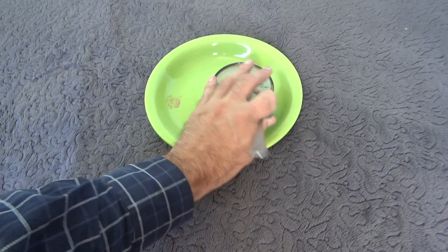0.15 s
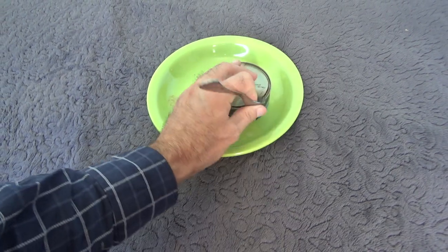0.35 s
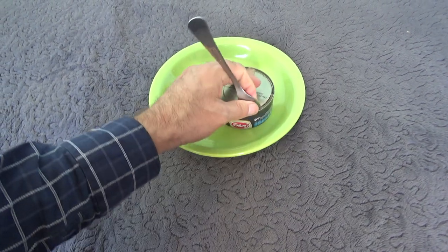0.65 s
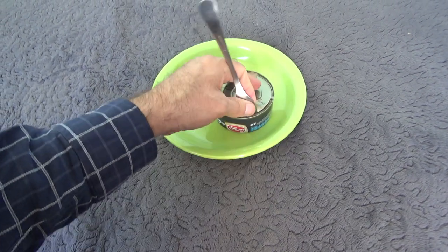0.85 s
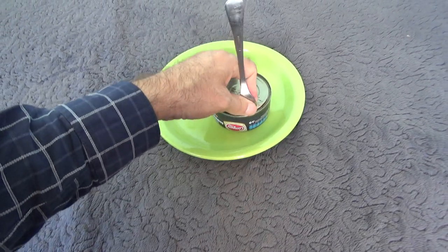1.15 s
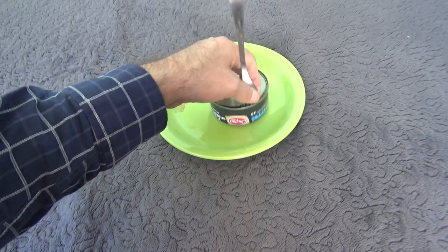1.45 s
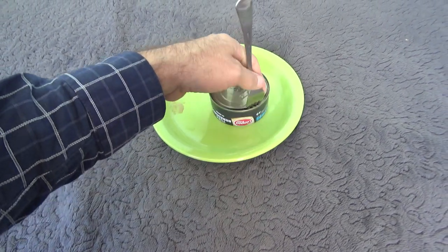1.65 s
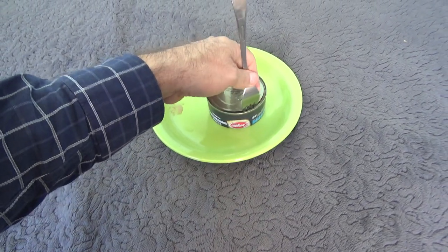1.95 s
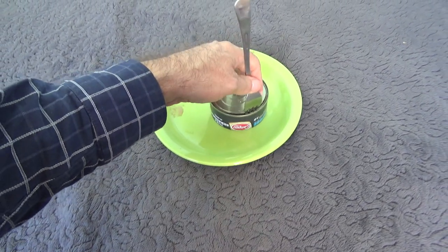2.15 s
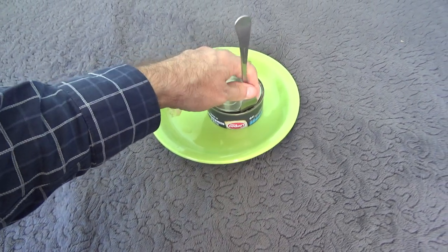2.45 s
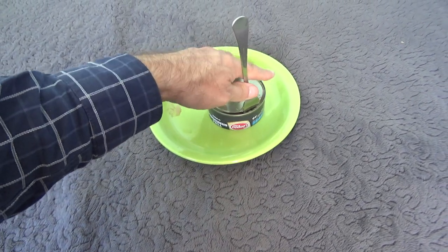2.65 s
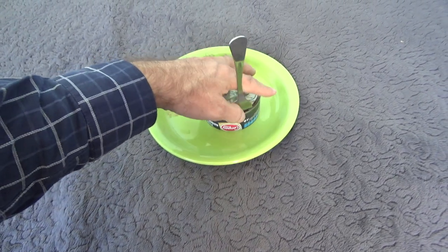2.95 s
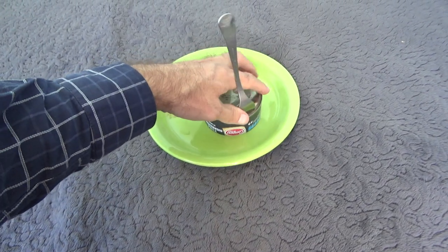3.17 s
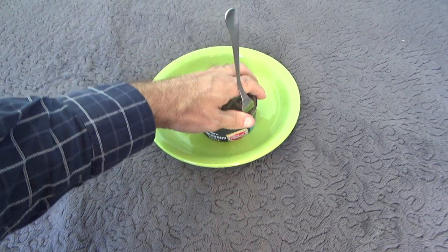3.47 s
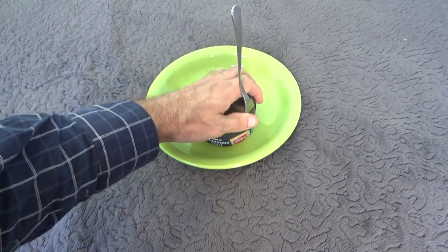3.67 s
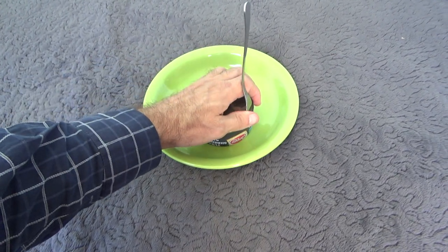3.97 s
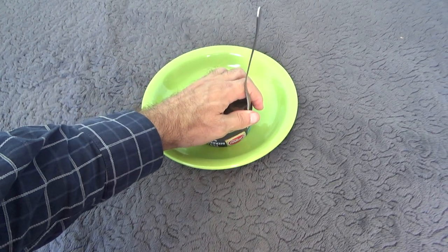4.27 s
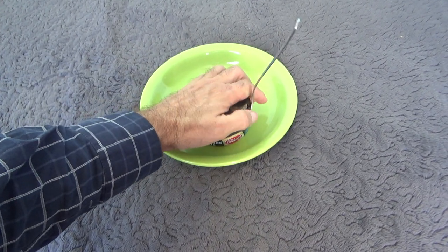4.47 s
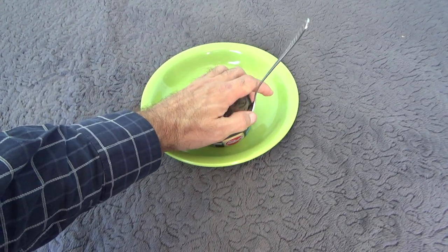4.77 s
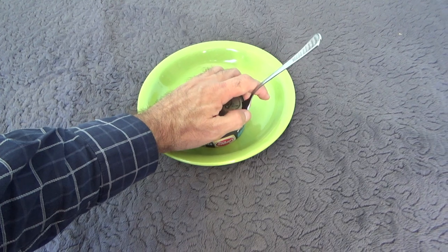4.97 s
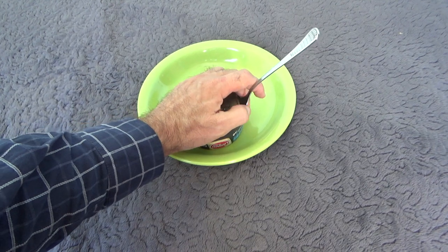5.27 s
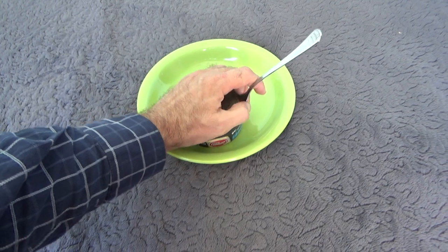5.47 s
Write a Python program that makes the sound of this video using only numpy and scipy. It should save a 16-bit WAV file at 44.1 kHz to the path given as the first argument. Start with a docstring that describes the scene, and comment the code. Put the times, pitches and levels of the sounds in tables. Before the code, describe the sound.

Steel fork clinks and scratches on a small tin, forcing its lid in three short loud rasps, in a small softly humming room.

```python
"""Prying open a tin can

A fork pries at the lid of a tin can that stands on a plate, in a small room with a humming appliance.
Steel knocks and chirps on the tin, forces the lid in three loud rasps, and scratches lightly along the rim.
Scrapes are streams of tiny slips that ring the can under a coloured noise; short bursts wake damped sines.
The plate bumps and rumbles on its cloth; filtered noise makes the hum, the air and the room's tail.
"""
import sys
import numpy as np
from scipy import signal
from scipy.fft import rfft, irfft
from scipy.io import wavfile
from scipy.ndimage import uniform_filter1d

SR = 44100
rng = np.random.default_rng(int(sys.argv[2]) if len(sys.argv) > 2 else 0)


def transcribe(u):
    """Save the signal u as a 16-bit wav file named by the first command-line argument.

    u: samples, shape (n,) or (channels, n), limited to [-1, 1]; the rate is SR.
    q: integer samples, one column per channel.
    """
    v = np.clip(np.atleast_2d(u).T, -1, 1)
    q = np.round(v * 32767).astype(np.int16)
    wavfile.write(sys.argv[1], SR, q)


N = 247930
BINS = np.fft.rfftfreq(8192, 1 / SR)  # frequency grid of the filters, Hz

# The can's resonances, for short bursts and light scratches.
# Each row: centre in Hz, width in Hz, relative level in dB.
CAN_MODES = [(1063, 77, -3.5), (1388, 340, -15.5), (1390, 14, 6), (1530, 12, -1.5), (1850, 160, -6.5),
             (2007, 95, -4), (2430, 83, -17.5), (3290, 144, -8.5)]


def gain_of(db):
    """Decibels to amplitude."""
    return 10 ** (np.asarray(db) / 20)


def evened(x):
    """Scales to rms 1."""
    return x / np.sqrt(np.mean(x ** 2) + 1e-20)


def read(points, hz):
    """Reads a spectrum table between its points on a log-frequency axis."""
    f, value = np.transpose(points)
    return np.interp(np.log(hz + 1), np.log(f + 1), value)


def add(mix, s, sound):
    """Mixes a sound in at time s, in seconds."""
    part = mix[max(round(s * SR), 0):][:len(sound)]
    part += sound[:len(part)]


def resonances(modes, hz=BINS):
    """Amplitude response of damped modes, summed in power."""
    f = hz + 1
    power = 0
    for centre, width, db in modes:
        detuning = (f * f - centre ** 2) / (f * width)
        power = power + gain_of(db) ** 2 / (1 + detuning ** 2)
    return np.sqrt(power)


def ring(drive, gain):
    """Passes a force through a causal minimum-phase filter of this spectral shape and unit energy."""
    log_gain = np.log(np.concatenate([gain, gain[-2:0:-1]]) + 1e-6)
    response = np.exp(np.conj(signal.hilbert(log_gain)))
    taps = np.fft.ifft(response).real[:len(gain)]
    return signal.fftconvolve(drive, taps / np.linalg.norm(taps))


def struck(modes, bass_hz, order=3):
    """Damped sines of alternating sign: the ring takes a few cycles to build, and gives off little bass."""
    t = np.arange(SR // 5) / SR
    out = np.zeros(len(t))
    for k, (hz, width, db) in enumerate(sorted(modes)):
        decay = np.exp(-np.pi * width * t)
        out += (-1) ** k * gain_of(db) * width * decay * np.sin(2 * np.pi * hz * t)
    bass_cut = signal.butter(order, bass_hz, "high", fs=SR, output="sos")
    return signal.sosfilt(bass_cut, out)


def slips(size, per_s, spread_db, rub):
    """Stick and slip: random clicks of uneven size over a fine rubbing, at steady mean power."""
    chance = rng.random(size)
    strength = rng.exponential(1, size)
    fine = rng.standard_normal(size)
    clicks = (chance < per_s / SR) * gain_of(spread_db * np.minimum(strength, 4)) * np.sign(fine)
    force = evened(clicks) + rub * fine
    return force / np.sqrt(abs(uniform_filter1d(force ** 2, size=400)) + 1e-9)


def diffuse(pair):
    """Spectra of two unrelated signals, made as alike as the two microphones hear the room."""
    # Each row: frequency in Hz, likeness of the two sides from 0 to 1.
    likeness = [(60, 0.83), (300, 0.41), (1500, 0.95), (4000, 0.52), (14000, 0.73)]
    a, b = rfft(pair)
    same = np.clip(read(likeness, np.fft.rfftfreq(pair.shape[1], 1 / SR)), 0, 1)
    shared = np.sqrt((1 + same) / 2) * a
    own = np.sqrt((1 - same) / 2) * b
    return shared + np.array([own, -own])


def background(hum_db=-48, air_db=-53):
    """An appliance hums in narrow, wavering bands of noise over the faint air of the room."""
    # Bands of the hum. Each row: centre in Hz, width in Hz, relative level in dB.
    hum_bands = [(146.2, 2.8, 6.5), (138.5, 7.1, -15), (206.4, 5.8, -2.5), (257.8, 13.5, -4),
                 (299.2, 8.8, -0.5), (324, 32, -8), (589.6, 9.5, -11.5), (716.3, 14.4, -4.5),
                 (766, 15, -13), (849, 18.5, -7)]
    # Spectrum of the air. Each row: frequency in Hz, relative level in dB per Hz.
    air_spectrum = [(20, -6), (50, -4), (100, 3), (130, -2.5), (180, -10.5), (400, -2), (600, -8),
                    (1000, -13.5), (1400, -12), (1900, -10.5), (2350, -16.5), (4500, -18), (6300, -13),
                    (8500, -17), (12500, -18), (16000, -23.5)]
    hz = np.fft.rfftfreq(N, 1 / SR)
    hum = irfft(diffuse(rng.standard_normal((2, N))) * resonances(hum_bands, hz), N)
    air = irfft(diffuse(rng.standard_normal((2, N))) * gain_of(read(air_spectrum, hz)), N)
    return gain_of(hum_db) * evened(hum) + gain_of(air_db) * evened(air)


def room(x, first_s=0.0025, build_s=0.011):
    """The room's short tail: diffuse noise that builds up, then decays at its own pace in each band."""
    # Decay. Each row: frequency in Hz, time to fall by 60 dB in seconds.
    decay_times = [(300, 0.17), (1500, 0.39), (3200, 0.3958), (6000, 0.3), (14000, 0.18)]
    # Strength. Each row: frequency in Hz, level in dB against the direct sound.
    tail_levels = [(200, -8.5), (1600, -6), (3200, -5), (6000, -9.5), (14000, -15)]
    t = np.arange(SR // 2) / SR
    swell = np.clip((t - first_s) / build_s, 0, 1)
    noise = irfft(diffuse(rng.standard_normal((2, len(t))))) * swell
    hz, at, z = signal.stft(noise, SR, nperseg=256)
    t60 = read(decay_times, hz)[:, None]
    unit_energy = np.sqrt(2 * np.log(1000) / (t60 * SR))
    fade = np.exp(-np.log(1000) * at / t60) * unit_energy
    level = gain_of(read(tail_levels, hz))[:, None]
    tail = signal.istft(z * fade * level, SR, nperseg=256)[1][:, :len(t)]
    return signal.fftconvolve(x[None], tail, axes=1)[:, :N]


def nearby(x, near_s=0.0013, count=5):
    """Quick reflections off plate and hand widen the sound; they change as the hand moves."""
    # What reaches the two microphones unequally.
    # Each row: frequency in Hz, level in dB against the direct sound.
    side_levels = [(100, -2), (500, -2.5), (1500, -8.5), (3000, -20), (5000, -11), (9000, -6), (14000, -13)]
    t = np.arange(SR // 40) / SR
    taps = rng.standard_normal((count, len(t))) * np.exp(-t / near_s)
    taps /= np.linalg.norm(taps, axis=1, keepdims=True)
    # steady crossfade from one pattern of reflections to the next
    pose = np.arange(N) / N * (count - 1)
    share = np.sqrt(np.maximum(1 - abs(pose - np.arange(count)[:, None]), 0))
    side = signal.fftconvolve(x * share, taps, axes=1)[:, :N].sum(0)
    side = irfft(rfft(side) * gain_of(read(side_levels, np.fft.rfftfreq(N, 1 / SR))), N)
    return np.array([side, -side])


def plate_shifts(mix):
    """The hand rocks the plate on its soft cloth: swells of noise through low, damped resonances."""
    # Each row: middle in seconds, length in seconds, level in dB.
    shifts = [(0.876, 0.13, -56), (3.784, 0.056, -59), (4.161, .1, -55)]
    # Bounce on the cloth. Each row: centre in Hz, width in Hz, relative level in dB.
    cloth_modes = [(65, 35, 1), (105, 40, -2)]
    for s, length, db in shifts:
        swell = np.hanning(round(2 * length * SR))
        push = swell * rng.standard_normal(len(swell))
        add(mix, s - length, gain_of(db) * ring(push, resonances(cloth_modes) ** 2))


def contact_burst(s, ring_db, spot_hz, tick_db, modes, bass_hz, spot_width_hz=100, spot_db=1, octave_db=9.5,
                  chatter_s=0.0021, chatter=1.0, lead_s=.006, rattle=0.27, rattle_s=0.014):
    """Metal chatters for a few milliseconds around one firm impulse, then rattles to rest."""
    # The bright tick of the chatter. Each row: frequency in Hz, relative level in dB per Hz.
    tick_spectrum = [(100, -51), (900, -38), (2000, 5), (3500, 0), (4400, -0.5), (5400, 5.5), (6500, 1),
                     (8000, 1), (10000, -1.5), (11500, 4), (14000, -6), (16000, -12)]
    t = np.arange(0, 6 * lead_s, 1 / SR) - lead_s
    contacts = slips(len(t), per_s=5800, spread_db=5, rub=0.38)
    burst = contacts * np.exp(-.5 * (t / chatter_s) ** 2)
    burst /= np.linalg.norm(burst)
    settle = contacts * np.exp(-abs(t) / rattle_s) * (t > 0)
    force = chatter * burst + rattle * settle / np.linalg.norm(settle)
    force[np.argmin(abs(t))] += 1  # the firm impulse
    # the force favours the modes near the pitch of the spot it acts on
    woken = [(hz, width, db - octave_db * abs(np.log2(hz / spot_hz))) for hz, width, db in modes]
    spot = (spot_hz, spot_width_hz, spot_db)
    body = signal.fftconvolve(force, struck(woken + [spot], bass_hz))
    sound = gain_of(ring_db) * body / np.linalg.norm(body)
    tick = ring(burst, gain_of(read(tick_spectrum, BINS)))
    add(sound, 0, gain_of(tick_db) * tick)
    return s - lead_s, sound


def plate_bumps(mix):
    """Can and fork bump the plate as the hand takes them up, and wake the plate's modes."""
    # Each row: time in seconds, ring in dB, pitch of the struck spot in Hz, tick in dB.
    bumps = [(0.16, -7.5, 1192, -31), (0.271, -16, 1460, -44), (0.321, -7, 1285, -17),
             (0.3338, -16, 2270, -43), (0.3705, -8.5, 1054, -40)]
    # Each row: centre in Hz, width in Hz, relative level in dB.
    plate_modes = [(278, 87, -3), (630, 150, -14), (862, 63, -1.5), (1046, 30, 0.5), (1196, 46, 0),
                   (1458, 99, -20), (1965, 90, -1.5), (2420, 91, -8.5), (3000, 220, -11)]
    for row in bumps:
        add(mix, *contact_burst(*row, plate_modes, bass_hz=330))


def scratch(s, length, db, spot_width_hz=130, spot_db=3, top_hz=14200, grip=0.04):
    """A light stroke swells and fades: its slips ring the can at the touched spot and hiss in the tines."""
    # Where the fork touches as it works round the can. Each row: time in seconds,
    # pitch of the touched spot in Hz, hiss of the tines in dB over the can's ring.
    contact_path = [(0.33, 1110, -13), (0.6, 1030, -5), (1.05, 990, -3), (1.5, 1530, -3),
                    (3.06, 1620, -6.5), (3.32, 1440, -7.5), (3.74, 1280, -2), (3.98, 1120, -2),
                    (4.13, 1270, 2.5), (5.07, 1650, 1.5), (5.35, 1590, 7)]
    # The tines. Each row: centre in Hz before retuning, width in Hz, relative level in dB.
    tine_modes = [(2170, 225, 0), (2930, 68, -0.5), (3590, 230, -0.5), (4955, 110, 4.5), (5980, 280, -1),
                  (6640, 170, -6.5), (7420, 250, 2.5), (8000, 340, 0), (9700, 1500, -7), (11300, 1300, -3),
                  (12900, 1000, -5)]
    times, pitches, hisses = np.transpose(contact_path)
    spot_hz, hiss_db = np.interp(s, times, pitches), np.interp(s, times, hisses)
    swell = np.hanning(round(2 * length * SR))
    # the grip retunes the tines a little at every stroke
    retune = 1 + grip * rng.standard_normal(len(tine_modes))
    gripped = [(hz * k, width, level) for (hz, width, level), k in zip(tine_modes, retune)]
    force = gain_of(db) * swell * slips(len(swell), per_s=1500, spread_db=0.0, rub=1.0)
    body = ring(force, resonances(CAN_MODES + [(spot_hz, spot_width_hz, spot_db)]))
    tines = ring(force, resonances(gripped) / np.sqrt(1 + (BINS / top_hz) ** 10))
    return s - length, body + gain_of(hiss_db) * tines


def fumble(start, end, db, gap_s=.06, length_s=0.046, spread_db=7):
    """Faint scratches at loose intervals and of uneven strength, as rows for scratch()."""
    times = np.arange(start, end, gap_s)
    late, longer, louder = rng.uniform(-1, 1, (len(times), 3)).T
    return zip(times + late * gap_s / 2, length_s * (1 + longer / 2), db + spread_db * louder)


def rim_scratches(mix):
    """The fork scratches lightly along the rim, and in some spells feels its way more faintly."""
    # Each row: middle in seconds, length in seconds, level in dB.
    strokes = [(0.332, 0.022, -39), (0.671, 0.085, -46), (1.002, .018, -45), (1.044, .066, -50.5),
               (1.91, 0.053, -51), (2.253, 0.064, -49.5), (3.062, .068, -56.5), (3.322, 0.064, -49.5),
               (3.739, 0.03, -42.5), (3.754, .014, -38), (3.857, 0.041, -50.5), (3.919, .029, -53),
               (3.976, 0.025, -48), (4.09, 0.025, -44.5), (4.11, .011, -40), (4.139, 0.021, -43.5),
               (4.159, 0.016, -46.5), (4.201, 0.033, -47), (5.061, .017, -46), (5.093, 0.052, -45.5),
               (5.137, 0.045, -42.5), (5.256, 0.045, -56.5), (5.55, 0.065, -59.5)]
    # Each row: start in seconds, end in seconds, middle level in dB.
    fumbles = [(0.424, 0.92, -55), (1.38, 1.55, -56), (3.482, 3.72, -57), (3.993, 4.06, -55),
               (5.332, 5.45, -60)]
    faint = [row for spell in fumbles for row in fumble(*spell)]
    for row in [*strokes, *faint]:
        add(mix, *scratch(*row))


def can_bursts(mix):
    """Knocks of fork on tin, surges within the first rasp and two short high chirps, all ringing the can."""
    # Each row: time in seconds, ring in dB, pitch of the excited spot in Hz, tick in dB.
    bursts = [(0.9835, -19.5, 850, -20), (1.2409, 6.5, 1660, 0.5), (1.6392, 3.5, 1860, 7),
              (1.6440, -1, 1380, -3), (1.6495, 6, 1940, -4), (1.6670, 7, 1950, -4),
              (2.292, -14, 3700, -12.5), (2.301, -8, 3800, -3), (2.3115, 3.5, 1320, -7),
              (2.3420, 3.5, 1400, -22), (2.6060, -9.5, 1373, -29), (4.8720, -3.5, 1600, -4)]
    for row in bursts:
        add(mix, *contact_burst(*row, CAN_MODES, bass_hz=900))


def rasp(row, modes, grit_colour, per_s, surge_db, bass_hz, surge_s=.003, grit_follow=2,
         start_db=-35.5, let_go_s=0.0046, slide_s=0.065, lift_s=0.036):
    """The fork bites, holds, slips free, slides on and lifts off; surging slips ring the lid amid noise."""
    bite, hold, ring_db, grit_db, rise, sag, drop, fade = row
    # the rasp begins start_db against its bite, which falls at t = 0
    t = np.arange(start_db / rise, hold + slide_s + lift_s, 1 / SR)
    free = np.maximum(t - hold, 0)
    press_db = rise * np.minimum(t, 0) - sag * np.clip(t, 0, hold)
    release_db = -drop * np.minimum(free / let_go_s, 1) - fade * free
    lift = np.minimum((t[-1] - t) / lift_s, 1)

    knots = np.arange(t[0], t[-1] + surge_s, surge_s)
    surges = gain_of(surge_db * np.interp(t, knots, rng.uniform(-1.4, 1, len(knots))))
    scrape = evened(surges * slips(len(t), per_s, spread_db=3, rub=0.94))
    force = scrape * gain_of(release_db) * lift

    radiated = BINS ** 2 / (BINS ** 2 + bass_hz ** 2)  # a small can gives off little bass
    body = ring(force * gain_of(ring_db + press_db), resonances(modes) * radiated)
    # the noise follows the pressure more steeply
    grit_force = force * gain_of(grit_db + grit_follow * press_db)
    grit = ring(grit_force, gain_of(read(grit_colour, BINS)))
    return bite + t[0], body + grit


def lid_rasps(mix):
    """The fork pries, bends and drags along the lid, which rings differently as it loosens."""
    # Each row: bite in seconds, hold in seconds, ring in dB, grit in dB, rise in dB per second,
    # sag during the hold in dB per second, drop on letting go in dB, fade in dB per second.
    rasp_rows = [(1.638, 0.046, -17, -26.5, 1399.5, 20, 3, 265),
                 (2.308, 0.039, -19, -21, 2800, 125, 11.5, 69),
                 (4.814, 0.056, -29, -27.5, 1000, -6, 4, 252)]
    # The lid in each rasp. Each row: centre in Hz, width in Hz, relative level in dB.
    pry_modes = [(119, 110, -13.5), (580, 200, -12.5), (910, 110, -12), (1293, 35, -5), (1390, 36, 2.5),
                 (1430, 81, -4.5), (1580, 40, -1), (1760, 1300, -9.5), (1844, 17, 1), (1940, 25, 2),
                 (1960, 25, -1), (2180, 35, -2.5), (2290, 22, -5), (2600, 39, -3), (2900, 300, -9),
                 (3150, 70, 0.5), (3230, 25, 2), (3620, 700, -8), (3900, 50, -11), (4640, 50, -7.5)]
    bend_modes = [(225, 120, -18), (481, 124, -10.5), (807, 65, -10.5), (960, 90, -12.5), (1140, 66, -14),
                  (1366, 23, 4), (1586, 50, -6), (1900, 150, -24), (2226, 38, -14), (3000, 190, -18.5),
                  (7770, 140, -16)]
    drag_modes = [(560, 70, -14), (964, 130, -10.5), (1360, 70, -22), (1658, 52, 3.5), (1970, 71, -7),
                  (2190, 120, -5.5), (2400, 95, -6.5), (3200, 180, -29), (3730, 280, -13.5),
                  (5180, 68, -4.5), (8270, 96, -9)]
    # Smoothed colour of the noise in each rasp. Each row: frequency in Hz, relative level in dB per Hz.
    pry_colour = [(100, -49), (1000, -20), (2500, 0), (4000, 10), (5500, 7), (7500, 10), (10000, -2),
                  (12500, 1), (14000, -16), (16000, -3)]
    bend_colour = [(100, -45), (1000, -6), (3000, -4), (4800, -3.5), (6200, -9.5), (7600, 0.5),
                   (9500, -0.5), (11500, -0.5), (12800, 3), (14000, -11), (16000, -10)]
    drag_colour = [(100, -40), (1000, -23), (3000, -3.5), (4400, -7), (6000, 1), (7600, 0), (9000, 0.5),
                   (11000, 1), (12600, -3), (13300, 10), (14000, -13), (16000, -26.5)]
    pry, bend, drag = rasp_rows
    add(mix, *rasp(pry, pry_modes, pry_colour, per_s=2500, surge_db=4.5, bass_hz=40))
    add(mix, *rasp(bend, bend_modes, bend_colour, per_s=3400, surge_db=-0.7, bass_hz=240))
    add(mix, *rasp(drag, drag_modes, drag_colour, per_s=4900, surge_db=3.5, bass_hz=306))


def scene():
    """Fork, can and plate, the room around them, and the hum."""
    direct = np.zeros(N)
    plate_shifts(direct)
    plate_bumps(direct)
    rim_scratches(direct)
    can_bursts(direct)
    lid_rasps(direct)
    return direct + nearby(direct) + room(direct) + background()


def record(dry, edge_hz=15900):
    """The two microphones differ in colour; then a low-pass limits the band."""
    # Each row: frequency in Hz, left minus right in dB.
    lean = [(50, -8.5), (150, -1), (300, -8.5), (700, -5.5), (1300, -3.5), (2200, -3.5), (5000, -1),
            (8000, 4.5), (13000, -4)]
    lean_db = read(lean, np.fft.rfftfreq(N, 1 / SR))
    heard = irfft(rfft(dry) * gain_of(np.array([lean_db, -lean_db]) / 2), N)
    low_pass = signal.firwin(511, edge_hz, window=("kaiser", 9), fs=SR)
    return signal.oaconvolve(heard, low_pass[None], "same")


dry = scene()
out = record(dry)
transcribe(out)
```